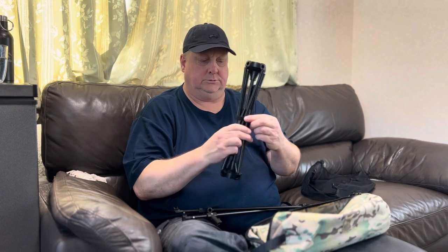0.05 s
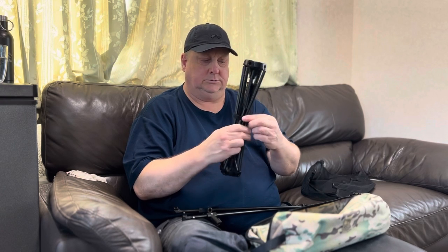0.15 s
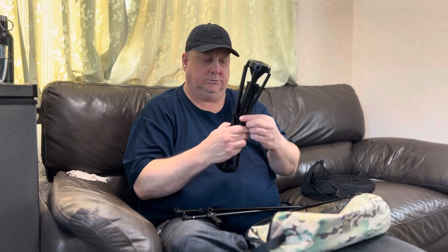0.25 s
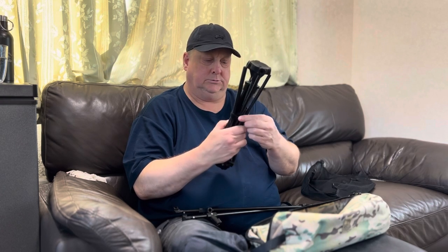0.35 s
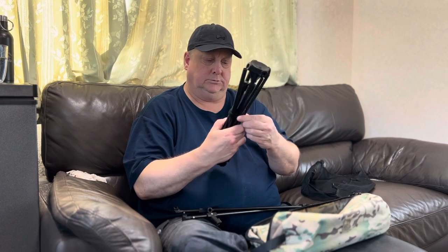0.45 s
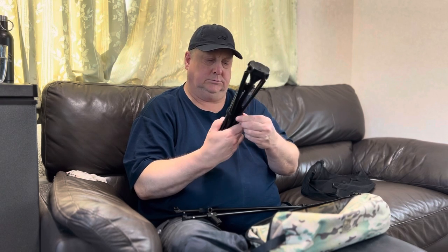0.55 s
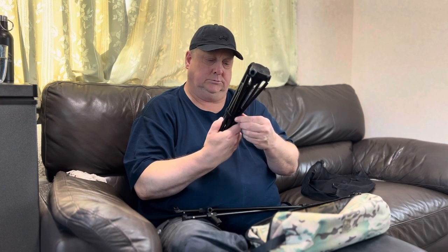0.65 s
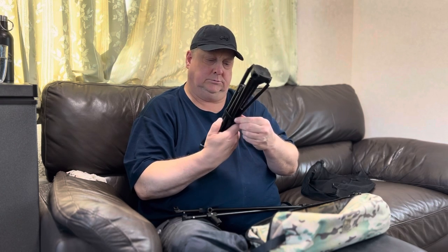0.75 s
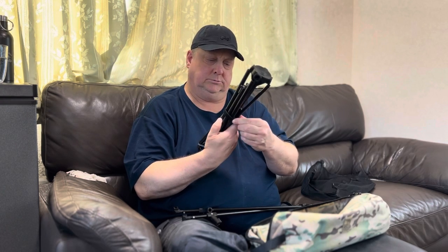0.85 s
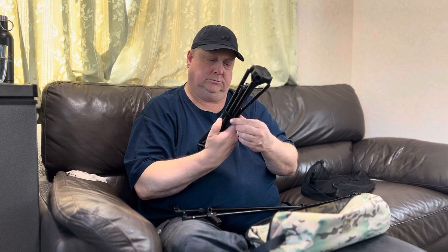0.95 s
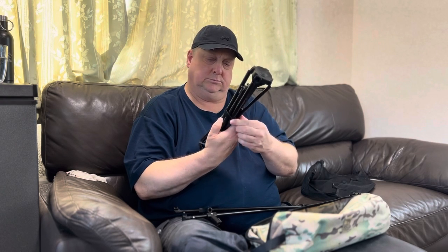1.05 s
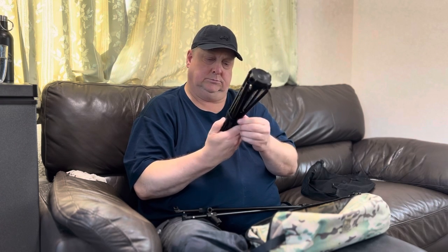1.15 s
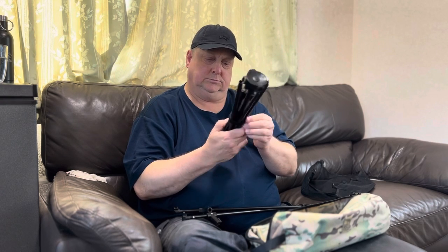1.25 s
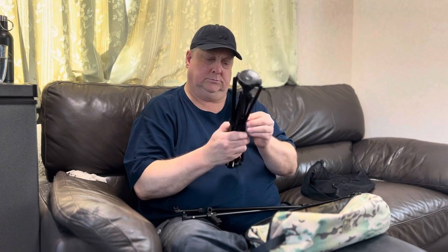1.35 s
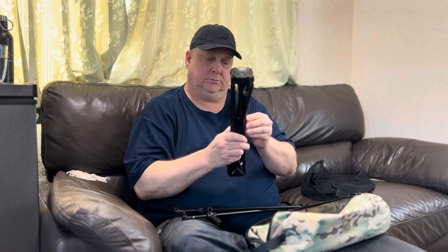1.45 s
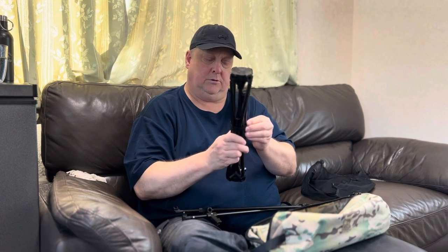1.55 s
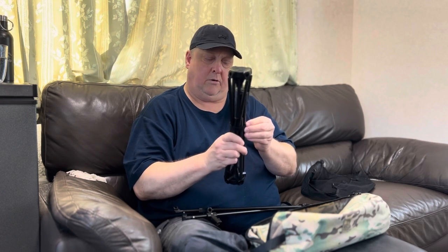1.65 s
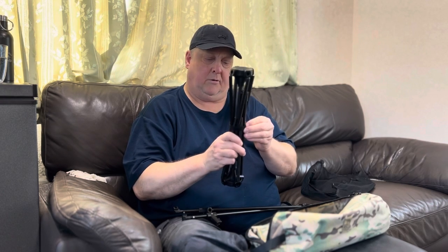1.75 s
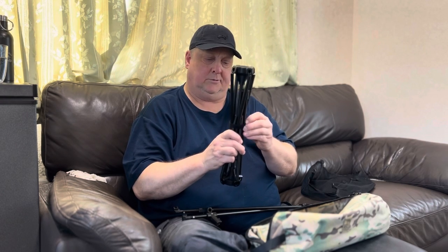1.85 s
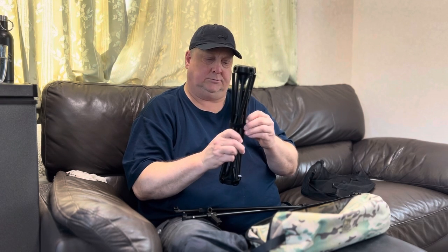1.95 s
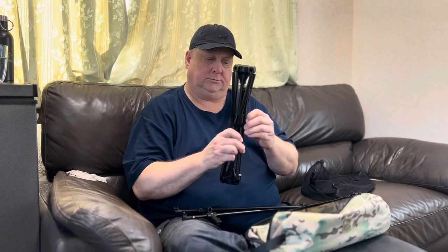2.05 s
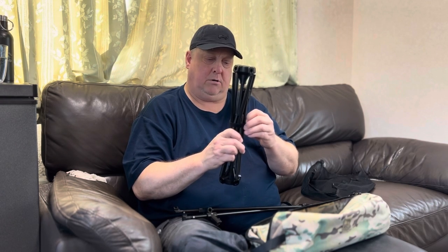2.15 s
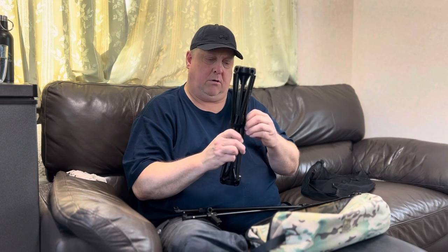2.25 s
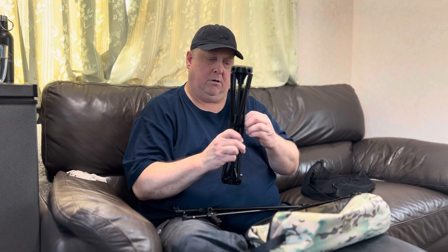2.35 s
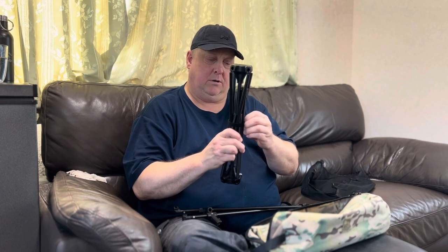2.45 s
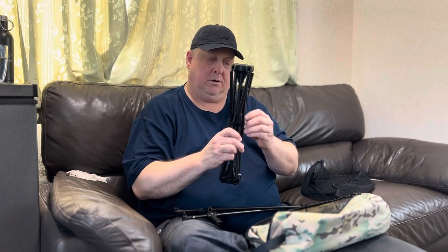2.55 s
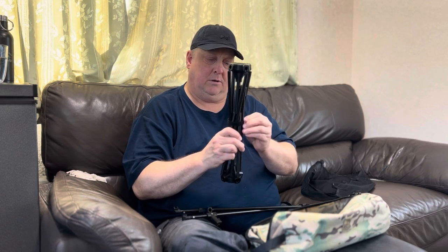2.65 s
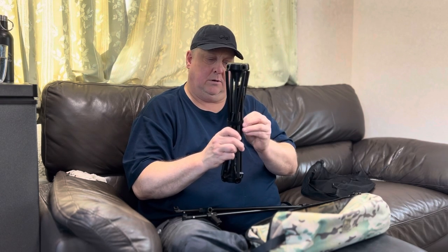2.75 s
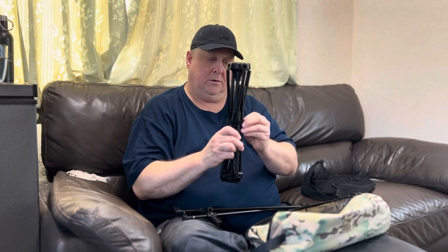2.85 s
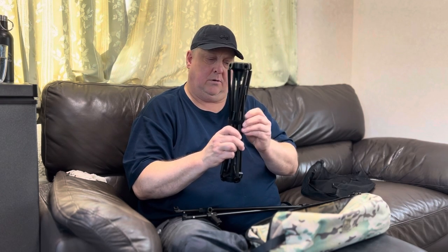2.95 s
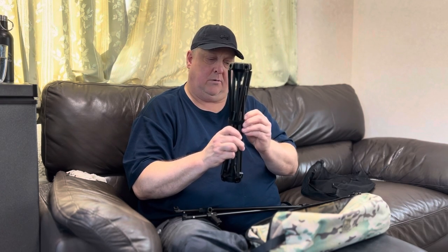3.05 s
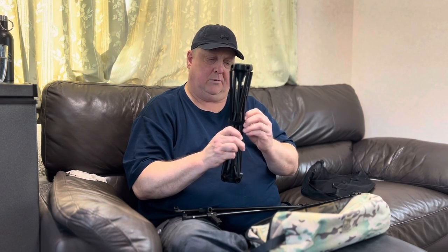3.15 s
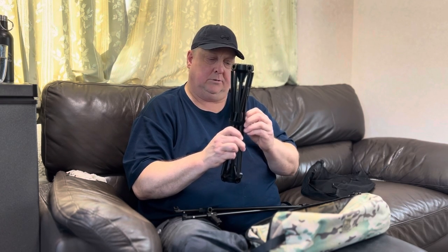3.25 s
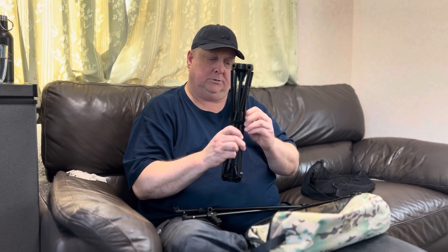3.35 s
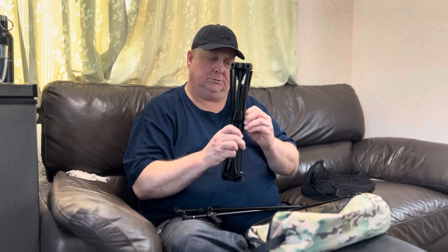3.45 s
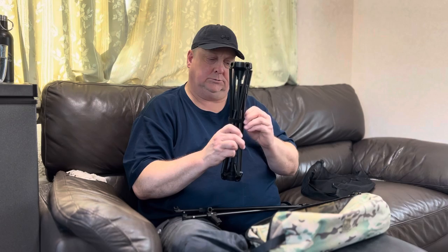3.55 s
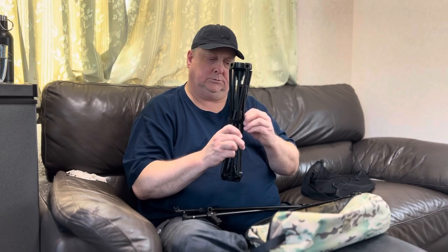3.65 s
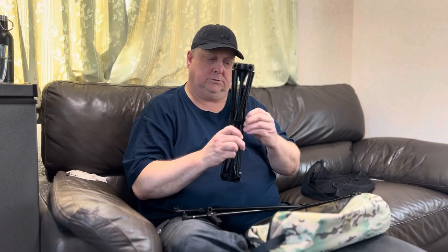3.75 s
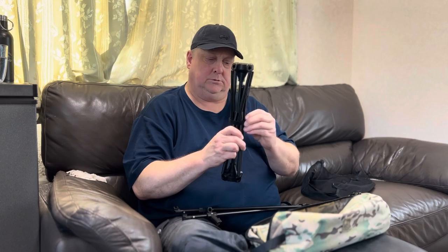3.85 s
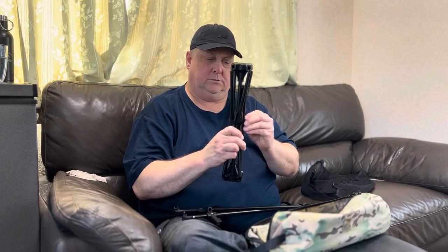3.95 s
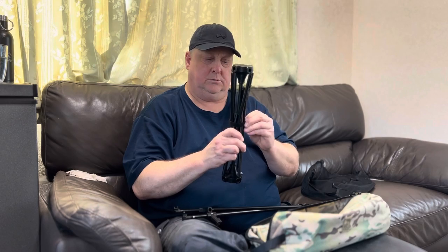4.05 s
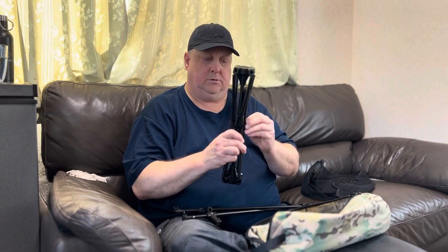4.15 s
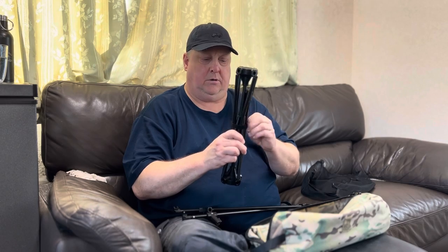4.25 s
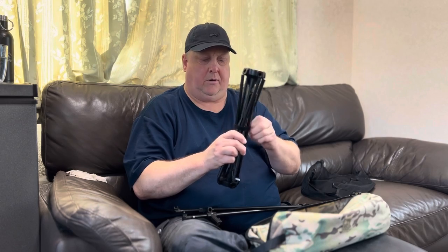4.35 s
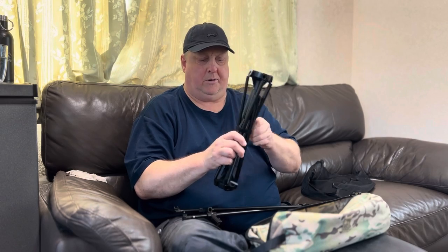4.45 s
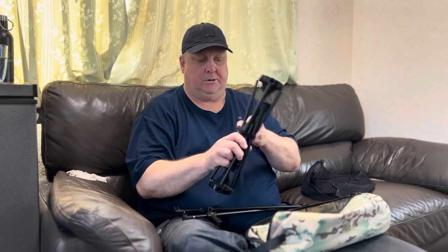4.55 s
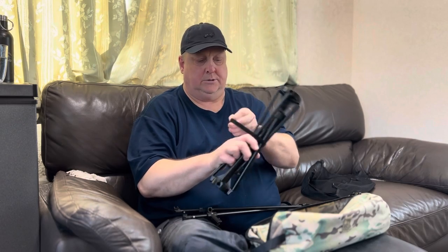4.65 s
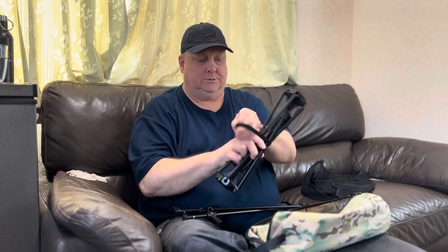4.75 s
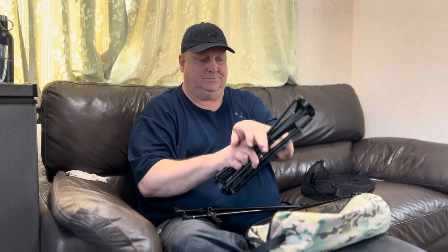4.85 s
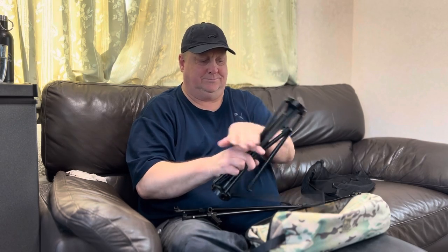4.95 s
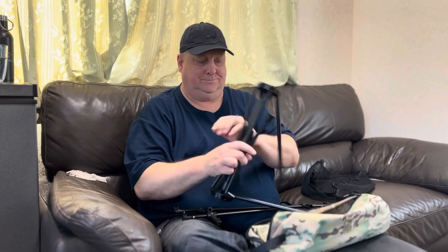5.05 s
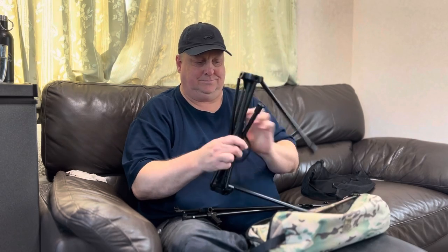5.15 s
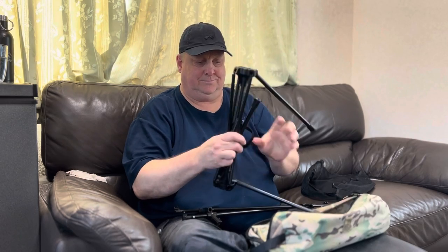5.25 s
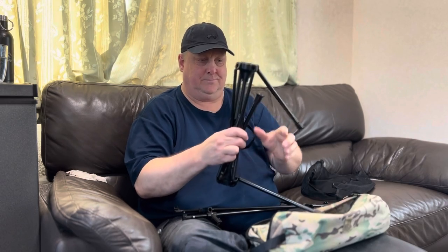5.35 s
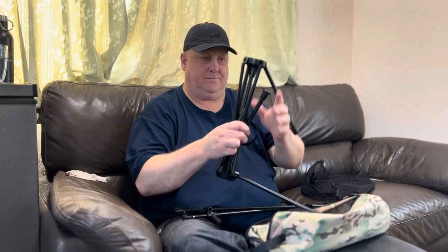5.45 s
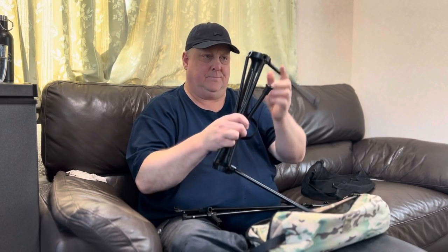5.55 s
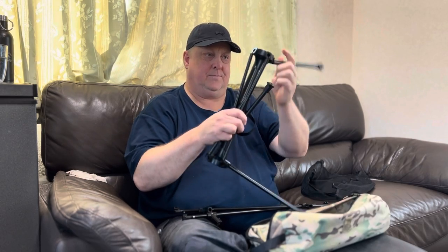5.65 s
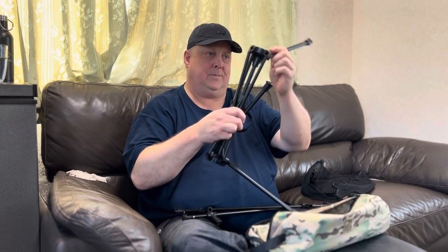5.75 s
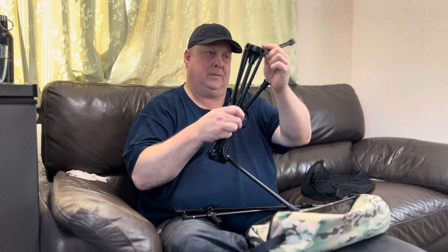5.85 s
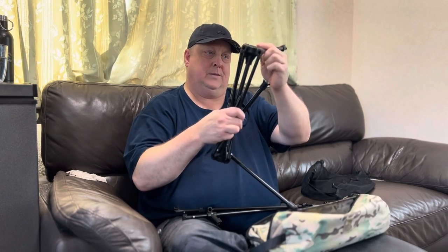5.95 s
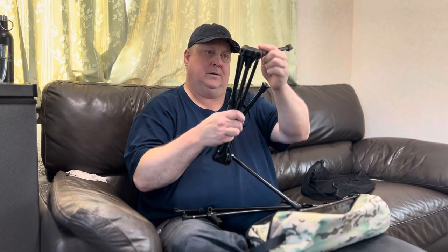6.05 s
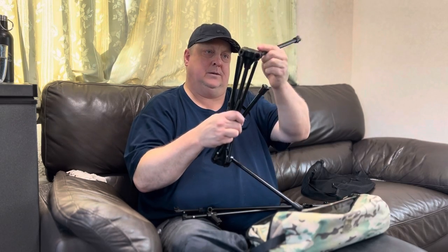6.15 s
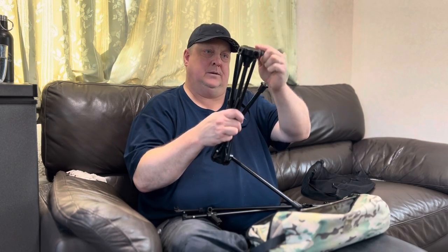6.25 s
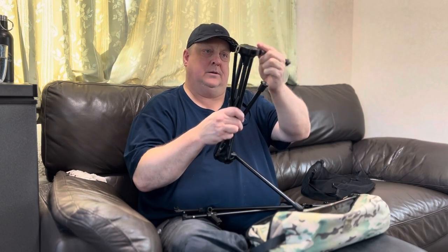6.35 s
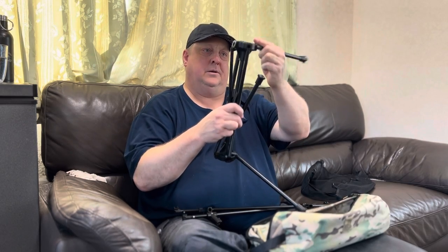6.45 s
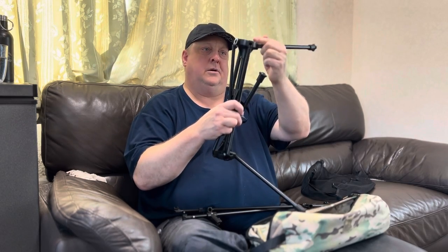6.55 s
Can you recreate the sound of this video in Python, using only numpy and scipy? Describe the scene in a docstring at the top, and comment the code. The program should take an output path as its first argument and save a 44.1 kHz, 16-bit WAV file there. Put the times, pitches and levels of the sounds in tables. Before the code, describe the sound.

Fingers rub faintly over a bundle of folded aluminium table legs and pick at a hook-and-loop strap with a few brief crackles. The strap rips open in one short pull. The tubes then fall apart with a clatter, knocking, ringing briefly, scraping in their hinges and bumping the seat before a last click. A phone hears it from a few metres away in a quiet living room with a low hum.

```python
"""Faint rustling, a hook-and-loop strap ripping open, then aluminium table legs clattering as they unfold.
Fingers rub and pick at the strap; its hooks spring free as a crackle and the freed tape drums.
The tubes fall apart, knock and ring, scrape in their hinges, bump the seat and click home.
A quiet, soft living room hums low and answers briefly; a phone hears it from a few metres away."""
import sys
import numpy as np
from scipy import signal
from scipy.fft import rfft, irfft, next_fast_len
from scipy.io import wavfile

SR = 44100
rng = np.random.default_rng(int(sys.argv[2]) if len(sys.argv) > 2 else 0)


def output_pcm(signal):
    """Save a mono or channel-first signal as 16-bit PCM at the path in sys.argv[1].

    Samples are clipped to [-1, 1] before scaling.
    """
    pcm = np.clip(np.atleast_2d(signal).T, -1, 1) * 32767
    wavfile.write(sys.argv[1], SR, np.round(pcm).astype(np.int16))


N = 290788


def amp(db):
    """dB to gain."""
    return 10 ** (np.asarray(db) / 20)


def unit(x):
    """x at rms 1."""
    return x / np.sqrt(np.mean(x ** 2) + 1e-20)


def along(points, hz):
    """Interpolate (f/Hz, value) points on a log frequency axis."""
    f, value = np.transpose(points)
    return np.interp(np.log(hz + 1), np.log(f + 1), value)


def envelope(points):
    """Gain per sample from (t/s, level/dB) points; silent outside them."""
    s, db = np.transpose(points)
    return amp(np.interp(np.arange(N) / SR, s, db, left=-200, right=-200))


def swells(rows):
    """Rounded swells from (t/s, length/s, level/dB, ...) rows; one gain curve per level column."""
    t = np.arange(N) / SR
    return sum(np.sin(np.pi * np.clip((t - s) / length_s, 0, 1)) ** 1.35 * amp(dbs)[:, None]
               for s, length_s, *dbs in rows)


def filtered(x, response):
    """x through a complex frequency response."""
    size = next_fast_len(x.shape[-1] + 8192)
    return irfft(rfft(x, size) * response(np.fft.rfftfreq(size, 1 / SR)), size)[..., :x.shape[-1]]


def band(f, hz, width_hz):
    """Response at f of a causal resonance."""
    return 1j * f * width_hz / (hz * hz - f * f + 1j * f * width_hz)


def resonate(x, hz, width_hz):
    """x through the same resonance twice, rms 1."""
    return unit(filtered(x, lambda f: band(f, hz, width_hz) ** 2))


def colour(x, spectrum):
    """x shaped by (f/Hz, level/dB) points, rms 1."""
    return unit(filtered(x, lambda f: amp(along(spectrum, f))))


def crackle(share, spread_db):
    """Random clicks of uneven size on a share of the samples."""
    size = amp(spread_db * np.minimum(rng.exponential(size=N), 4))
    return size * (rng.random(N) < share) * rng.standard_normal(N)


def stereo_noise(spectrum):
    """Steady noise, rms 1; left and right alike in the bass, nearly unrelated in the treble."""
    # left-right likeness: f/Hz, correlation
    likeness = [(30, 1), (100, 0.94), (250, 0.82), (700, 0.12), (2000, 0.08), (10000, 0.071)]

    def mid_side(f):
        angle = np.arccos(np.clip(along(likeness, f), -1, 1)) / 2
        return amp(along(spectrum, f)) * [np.cos(angle), np.sin(angle)]

    mid, side = filtered(rng.standard_normal((2, N)), mid_side)
    return unit(np.array([mid + side, mid - side]))


def hum_and_hiss(hum_db=-61, fade_db_per_s=0.34, hiss_db=-79):
    """Low murmur of the house, fading slightly, plus a faint steady hiss."""
    # low murmur: f/Hz, level/dB
    hum = [(18, -32.5), (30, -6.5), (54, 7), (102, -1), (200, -13.5), (290, -13), (351, -12), (469, -12),
           (551, -21), (647, -20), (772, -25), (1400, -27.5), (1820, -53.5), (3080, -120)]
    # faint hiss: f/Hz, level/dB
    hiss = [(820, -30.5), (1400, -11), (1700, 0.5), (2260, -13), (3260, -16), (3690, -20.5), (6590, -19),
            (9910, -39), (11500, -22.5), (16000, -37)]
    hum_gain = amp(hum_db - fade_db_per_s * np.arange(N) / SR)
    return hum_gain * stereo_noise(hum) + amp(hiss_db) * stereo_noise(hiss)


def room(x, gap_samples=150):
    """Wall reflections; a new random tail every 0.25 s, as the legs move about."""
    # reverberation time: f/Hz, t60/s
    decay = [(200, 0.26), (1400, 0.24), (4000, 0.27), (10000, 0.18)]
    out, step = np.zeros((2, N + SR)), SR // 4
    for start in range(0, N, step):
        hz, t, noise = signal.stft(rng.standard_normal((2, SR // 3)), SR, nperseg=256)
        tail = signal.istft(noise * amp(-60 * t / along(decay, hz)[:, None]), SR, nperseg=256)[1]
        tail[1] += 0.033 * tail[0]
        tail /= np.linalg.norm(tail, axis=1, keepdims=True)
        wet = signal.fftconvolve(x[None, start:start + step], tail, axes=1)
        out[:, start + gap_samples:][:, :wet.shape[1]] += wet
    return out[:, :N]


def seat():
    """The leather cushion shifts under the sitter: a low rub."""
    # cushion shifts: t/s, length/s, level/dB
    shifts = [(1.3, .55, -73.5), (5.96, 0.18, -62.5), (6.3, 0.83, -69)]
    return swells(shifts)[0] * resonate(rng.standard_normal(N), hz=270, width_hz=180)


def fingers(rest_db=-95.5, scuff_t60_s=0.078):
    """Grainy rub of skin on strap and tubes, never quite still; the tubes creak in the hand."""
    # bright skin rub: f/Hz, level/dB
    tone = [(1180, 24), (2000, 11.5), (6140, 5), (9090, 10), (10100, -6), (11400, 6), (16000, -9.5)]
    # finger slides: t/s, length/s, level/dB
    slides = [(-.2, 0.55, -79.5), (.15, 0.36, -81), (.46, 0.29, -89.5), (.76, 0.19, -81.5),
              (1.04, 0.11, -76.5), (1.12, 0.093, -77.5), (1.2, 0.23, -72.5), (1.42, 0.12, -86.5),
              (1.63, .09, -76.5), (1.76, 0.098, -75), (2.36, 0.12, -79.5), (2.48, 0.13, -83.5),
              (3.6, 0.18, -73)]
    # fingertips landing: t/s, level/dB
    touches = [(.07, -73), (1.718, -66.5), (2.01, -74), (2.064, -71), (2.148, -76), (2.964, -70),
               (3.18, -82), (3.253, -74), (3.85, -65), (3.988, -73)]
    # pitched creaks: t/s, level/dB, f/Hz, length/s
    creaks = [(1.149, -80, 3030, 0.039), (1.851, -70.5, 2670, 0.011), (2.007, -73.5, 2690, 0.017),
              (2.012, -77, 5860, 0.016), (2.06, -71.5, 6950, 0.023), (2.062, -75.5, 3770, 0.018),
              (2.31, -64.5, 1140, 0.03), (0.356, -83.5, 3020, 0.036), (0.817, -84, 4450, 0.042)]
    t = np.arange(N) / SR
    grain = crackle(share=0.3, spread_db=1.5)
    skin = colour(filtered(grain, lambda f: band(f, 6000, 12000) ** 2), tone)
    skin += amp(-24) * resonate(grain, 5020, 670) + amp(-13.5) * resonate(grain, 2900, 1500)
    scuffs = sum((t >= s) * amp(db - 60 * np.abs(t - s) / scuff_t60_s) for s, db in touches)
    out = (amp(rest_db) + swells(slides)[0] + scuffs) * skin
    for s, db, hz, length_s in creaks:
        n = round(length_s * SR) + 9
        slip = np.hanning(n) * rng.standard_normal(n)
        out[round(s * SR):][:n] += amp(db) * resonate(slip, hz, 0.11 * hz)
    return out


def bumps(t60_cycles=22.4):
    """The bundle pushes on cushion, hands and lap: a dull tone plus its lower octave."""
    # soft impacts: t/s, level/dB, f/Hz
    impacts = [(4.91, -39.5, 388), (4.957, -34, 410), (4.981, -32.5, 106.7), (5.029, -37.5, 80),
               (5.254, -53, 113), (5.262, -46, 325), (5.745, -48.5, 297), (6.014, -37.5, 518),
               (6.507, -45, 304)]
    out, t = np.zeros(N + SR), np.arange(SR // 4) / SR
    for s, db, hz in impacts:
        push = np.sin(2 * np.pi * hz * t) + np.sin(np.pi * hz * t) / 2
        attack = 1 - np.exp(-t * hz / 1.1)
        out[round(s * SR):][:len(t)] += amp(db - 60 * t * hz / t60_cycles) * push * attack
    return out[:N]


def hinges():
    """Dry metal slides on metal; hands rub dully on the tubes."""
    # leg swings: t/s, length/s, metal level/dB, hand level/dB
    swings = [(4.7, 0.22, -51, -61.5), (4.88, 0.21, -43.5, -50), (5.04, 0.19, -52.5, -51.5),
              (5.2, 0.54, -70.5, -67.5), (5.52, 0.37, -62.5, -62), (5.86, 0.29, -62.5, -59),
              (6.15, 0.55, -77, -75)]
    # dry scrape: f/Hz, level/dB
    tone = [(590, -39.5), (1000, -23.5), (2590, -1), (3600, -10.5), (8510, -14.5), (11700, -47),
            (13700, -44.5), (15000, -37)]
    metal_gain, hand_gain = swells(swings)
    grit = crackle(share=0.18, spread_db=-4)
    return metal_gain * colour(grit, tone) + hand_gain * resonate(grit, 490, 1300)


def strap(release_db_per_s=395, tape_start_db=-27, tape_end_db=-10.5):
    """Hooks spring free and shake the tubes; the freed tape drums more as each stroke goes on."""
    # bright hook crackle: f/Hz, level/dB
    tone = [(710, -101), (1200, -13.5), (7090, -0.5), (8930, 4.5), (10200, 1), (12400, 2), (13700, -8.5),
            (15300, 0), (16000, -17.5), (16500, -34)]
    # picks at a corner: t/s, length/s, start level/dB, end level/dB
    picks = [(2.232, 0.048, -68.5, -46), (2.687, 0.058, -73, -58.5), (2.847, 0.021, -74.5, -72),
             (3.392, 0.022, -61.5, -53), (3.515, 0.06, -49.5, -48.5), (4.022, 0.045, -71, -65)]
    # long pull that opens the strap: t/s, level/dB
    pull = [(4.179, -67.5), (4.21, -53.5), (4.32, -51), (4.37, -45), (4.46, -39), (4.51, -39.5),
            (4.535, -50), (4.55, -42), (4.61, -72)]
    hooks = crackle(share=0.1, spread_db=1.7)
    catches = crackle(share=0.02, spread_db=2)
    rip = colour(hooks, tone)
    rip += amp(-15) * resonate(catches, 1954, 220) + amp(-11.5) * resonate(catches, 2900, 2100)
    tape = resonate(hooks, 940, 4000)
    strokes = [[(s, start_db), (s + length_s, end_db), (s + length_s + .1, end_db - .1 * release_db_per_s)]
               for s, length_s, start_db, end_db in picks]
    out = np.zeros(N)
    for stroke in strokes + [pull]:
        times_s = [s for s, _ in stroke]
        drum = envelope([(times_s[0], tape_start_db), (times_s[-2], tape_end_db),
                         (times_s[-1], tape_end_db)])
        out += envelope(stroke) * (rip + drum * tape)
    clumps_db = 0.72 * resonate(rng.standard_normal(N), 38, 70)  # hooks let go in clumps
    return out * amp(clumps_db)


def snaps(t60_s=0.0083):
    """Single loud hooks and finger ticks: short bursts of band noise."""
    # ticks: t/s, peak level/dB, centre f/Hz
    ticks = [(0.0713, -46.5, 7760), (1.7204, -56.5, 8700), (1.8548, -60.5, 2730), (2.147, -53.5, 8000),
             (2.259, -33.5, 7450), (2.271, -39.5, 6160), (2.282, -28.5, 2740), (2.968, -60.5, 8300),
             (3.255, -63, 3000), (3.4, -38, 3900), (3.421, -36.5, 8700), (3.5175, -35.5, 8700),
             (3.535, -39.5, 8900), (3.5595, -45, 2080), (3.5831, -30, 2350), (3.8494, -44.5, 2430),
             (4.0235, -57, 4430), (4.038, -51.5, 3980), (4.053, -44.5, 4000), (4.065, -39, 6250),
             (4.18, -49.5, 6100), (4.191, -33.5, 9400), (4.2197, -36, 6700), (4.2399, -37.5, 5060),
             (4.2593, -42.5, 2050), (4.275, -43, 2020), (4.303, -43, 3000), (4.326, -36.5, 6050),
             (4.339, -36.5, 1870), (4.5451, -32, 5100)]
    out, t = np.zeros(N), np.arange(SR // 20) / SR
    for s, db, hz in ticks:
        burst = amp(-60 * t / t60_s) * rng.standard_normal(len(t))
        snap = resonate(burst, hz, 0.99 * hz)
        out[round(s * SR):][:len(t)] += amp(db) * snap / np.abs(snap).max()
    return out


def tube_modes(f, centre_hz):
    """Response of the tube modes near centre_hz; the grip damps the others."""
    # modes: f/Hz, level/dB, t60/s
    modes = [(1070, -3, .05), (1370, -3, .05), (1570, -3, .05), (1830, -3, .08), (1960, -2, .1),
             (2040, -2, .1), (2200, -2, .1), (2370, -2, .1), (2650, -2, .1), (2860, -3, .08),
             (3220, -4, .08), (3490, 0, .2), (3720, -3, .1), (4200, -4, .07), (4510, 0, .2),
             (4690, -4, .15), (5200, -3, .06), (6000, -3, .06), (6400, -3, .06), (7300, -2, .07),
             (7770, -3, .06), (8500, -4, .05)]
    return sum((-1) ** k * amp(db - 150 * np.log2(hz / centre_hz) ** 2) * t60_s * band(f, hz, 2.2 / t60_s)
               for k, (hz, db, t60_s) in enumerate(modes))


def clack_bands(f):
    """Responses of a contact's four registers: main, body, edge, sparkle."""
    paint = 1 / (1 + 1j * f / 9000 - (f / 9000) ** 2) ** 3  # painted tubes lose the top octave
    return np.array([band(f, 2100, 4000) ** 2 * paint, band(f, 700, 1300) ** 2,
                     band(f, 6500, 7000) ** 2 * paint, band(f, 11500, 3000) ** 2])


def knocks(middle_hz=2100, middle_db=-11, sparkle_re_edge_db=-16.5):
    """Tube hits tube or stop: a short loose rattle; the first blow rings two groups of modes."""
    # contacts: t/s, level/dB, body/dB, edge/dB, rattle t60/s, ring f/Hz, ring/dB
    # (body, edge and ring relative to level)
    contacts = [(4.6036, -40, -15, -2, 0.043, 5300, -4), (4.6629, -36, -38, -8, 0.12, 3170, -12),
                (4.731, -33, -37.5, -10, 0.028, 2920, -1), (4.7487, -38, -27.5, 9.5, 0.032, 5170, -4),
                (4.817, -41, -6, -11.5, 0.041, 1070, -9), (4.8238, -23, -22, -3, 0.038, 5470, -4),
                (4.8475, -40, -14.5, 11.5, 0.072, 7540, 9.5), (4.9100, -26.5, -17, -3, 0.16, 2620, -12),
                (4.9366, -26, -31.5, -11, 0.045, 2600, -7.5), (4.9595, -30.5, -1.5, -27, 0.036, 2430, 1.5),
                (4.9745, -16, -1.5, -13, 0.066, 1590, -13), (4.9994, -39, -4.5, -17, .04, 3280, -20),
                (5.122, -25, -18, -14.5, 0.06, 1722, -3.5), (5.251, -42, -20, -11, .02, 2000, -6),
                (5.2571, -17, -18.5, -4, 0.087, 4730, -6), (5.3267, -36.5, -25, -10.5, 0.043, 2530, -2),
                (5.4407, -44.5, -21, -26, 0.16, 1870, -7.5), (5.6191, -53, 2, -22.5, 0.099, 1600, 4),
                (5.68, -40, -28, 1.5, .045, 5450, -1), (5.7417, -20.5, -18, -11.5, 0.067, 3480, -9.5),
                (5.9308, -41.5, -26, -14, 0.18, 1560, -12.5), (5.943, -31, -17.5, -25, 0.076, 1540, -7),
                (5.9576, -47, -39.5, -16, .05, 1330, 5), (6.11, -55.5, -23, -9, 0.023, 1270, -1.5),
                (6.238, -62, -10.5, -16, 0.057, 3260, -7.5), (6.5026, -31, -6.5, -17.5, 0.1, 3500, -12)]
    out, t = np.zeros(N + SR), np.arange(SR // 4) / SR
    attack, blow = 1 - np.exp(-t / 0.00071), 1.0 * (t == 0)
    for s, db, body_db, edge_db, rattle_t60_s, ring_hz, ring_db in contacts:
        decay = amp(-60 * t / rattle_t60_s) + 0.95 * amp(-60 * t / 0.025)
        clack = filtered(attack * decay * rng.standard_normal(len(t)), clack_bands)
        ring = filtered(blow, lambda f: np.array([tube_modes(f, middle_hz), tube_modes(f, ring_hz)]))
        flutter = 1 + 0.9 * resonate(rng.standard_normal(len(t)), 60, 160)  # loose joints roughen the ring
        parts = np.vstack([clack, flutter * ring])
        parts /= 3 * parts[:, :SR // 100].std(axis=1, keepdims=True)  # peaks near 1 in the first 10 ms
        mix = amp([0, body_db, edge_db, edge_db + sparkle_re_edge_db, middle_db, ring_db])
        out[round(s * SR):][:len(t)] += amp(db) * mix @ parts
    return out[:N]


def scene(room_db=-3):
    """Direct and reflected sound at the phone's two ports, plus dry bumps, hum and hiss."""
    # port balance: f/Hz, left minus right/dB
    balance = [(60, 3), (150, -1.5), (380, -0.5), (950, 0), (2380, 1), (5980, 5), (15000, -2.5)]
    # port phase: f/Hz, left lead/rad
    lead = [(0, 0), (2070, -0.3), (3010, 1.5), (3880, 0.4), (8270, 0.4), (10600, -3.8), (11600, -6.0),
            (12500, -6.3), (13200, -9.2), (14500, -9.8), (15100, -12.7), (16700, -12.6)]
    direct = knocks() + fingers() + strap() + snaps() + hinges() + seat()
    heard = direct + amp(room_db) * room(direct)
    side = np.array([[0.5], [-0.5]])
    ports = filtered(heard, lambda f: amp(side * along(balance, f)) * np.exp(1j * side * along(lead, f)))
    return ports + bumps() + hum_and_hiss()


def record(dry, low_cut_hz=35, top_hz=16300):
    """The phone cuts the deepest bass and everything above its band limit."""
    return filtered(dry, lambda f: (f < top_hz) * f ** 2 / (f ** 2 + low_cut_hz ** 2))


dry = scene()
out = record(dry)
output_pcm(out)
```